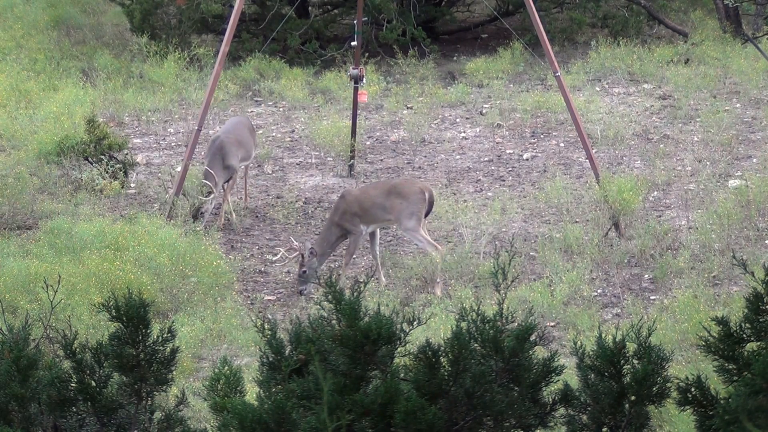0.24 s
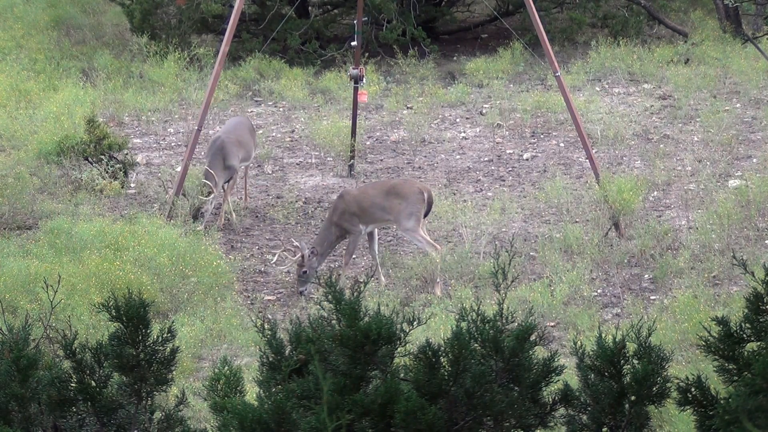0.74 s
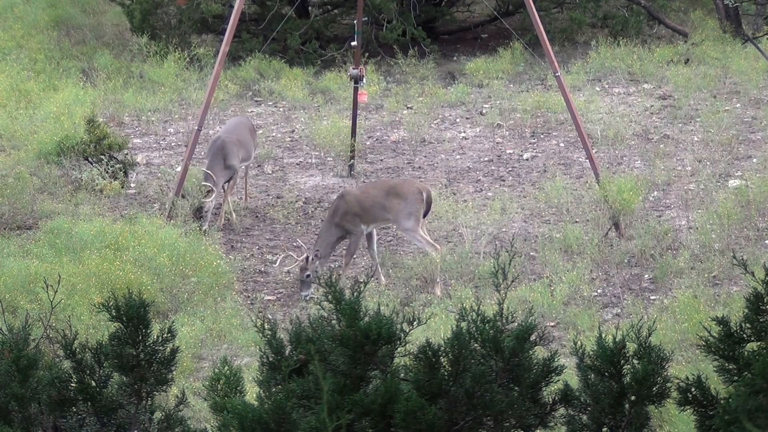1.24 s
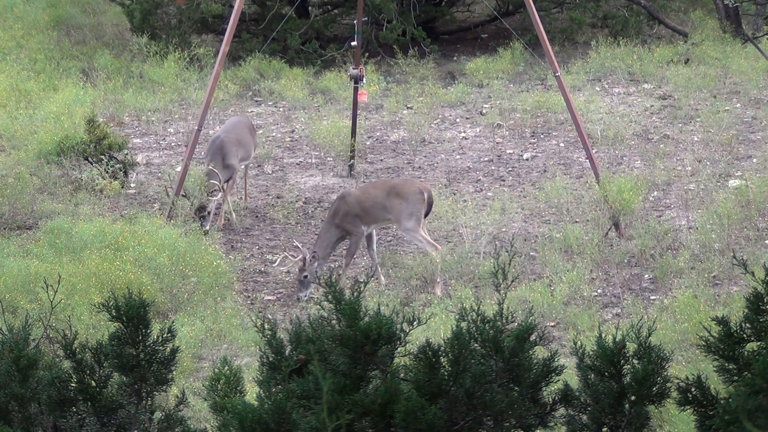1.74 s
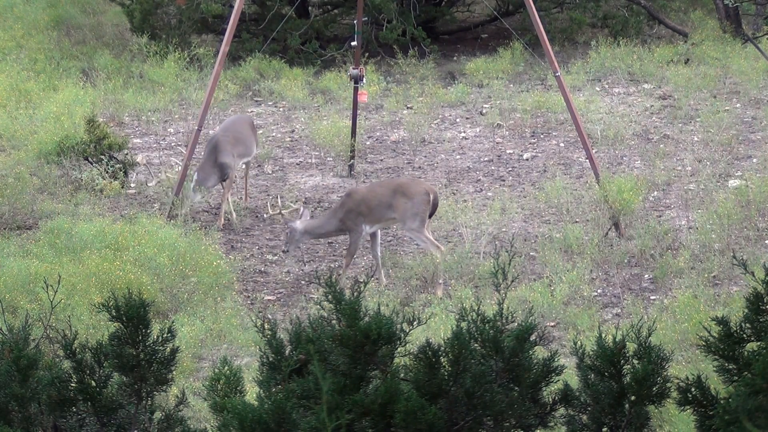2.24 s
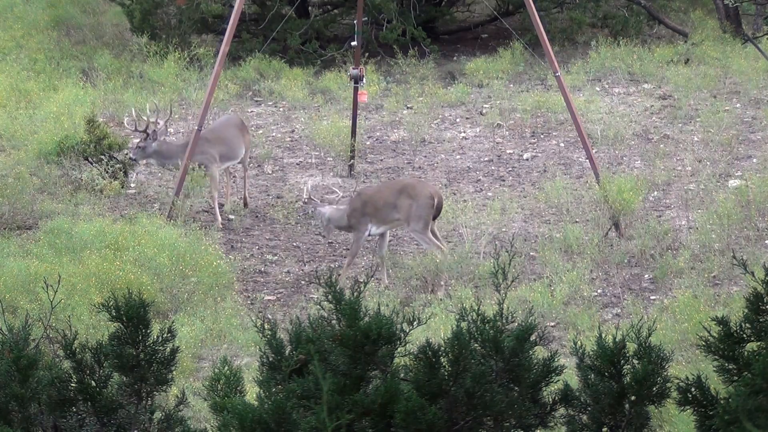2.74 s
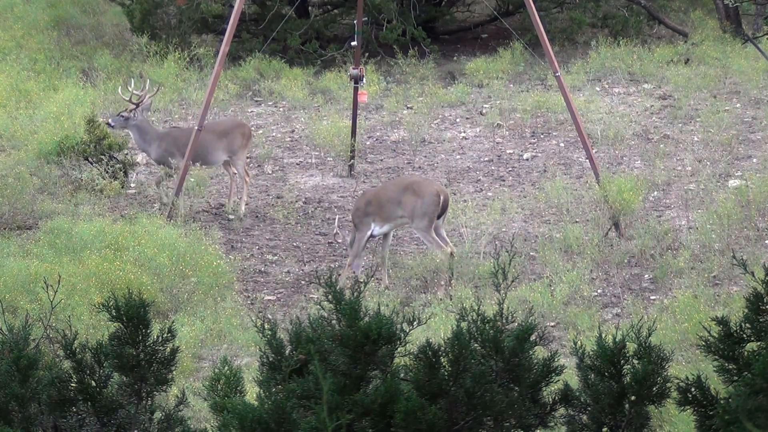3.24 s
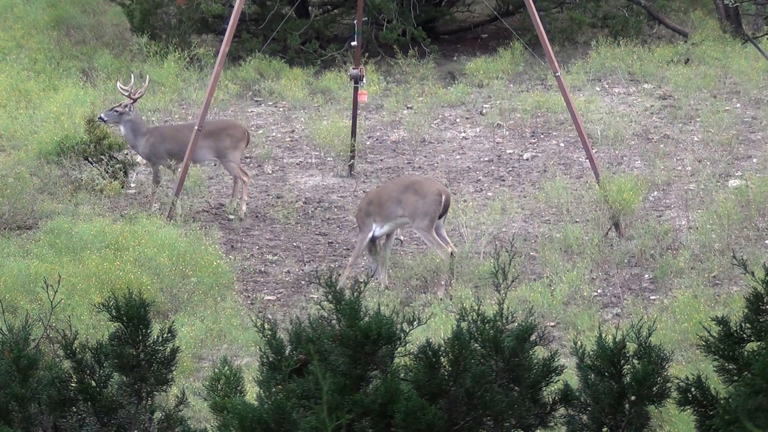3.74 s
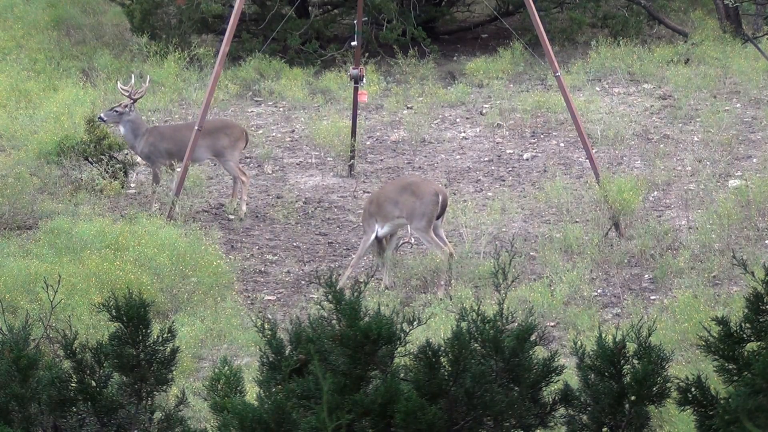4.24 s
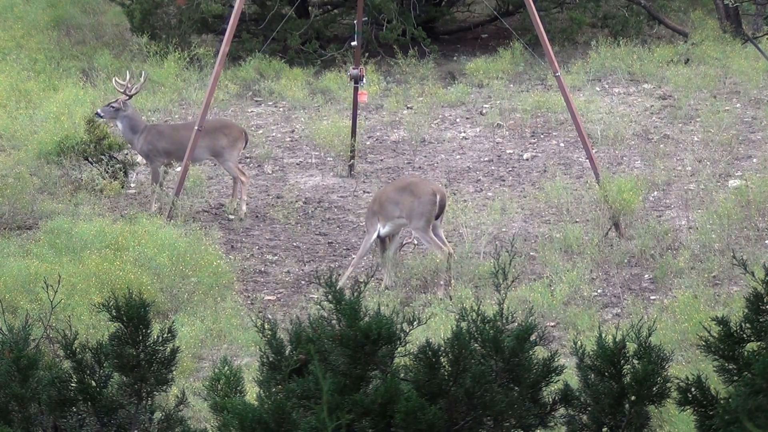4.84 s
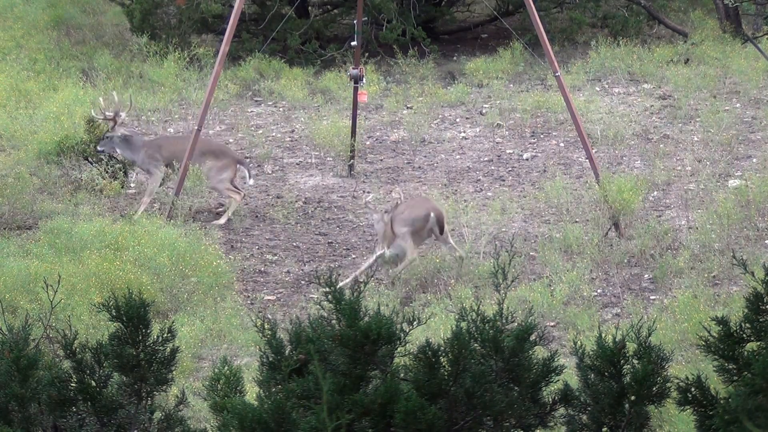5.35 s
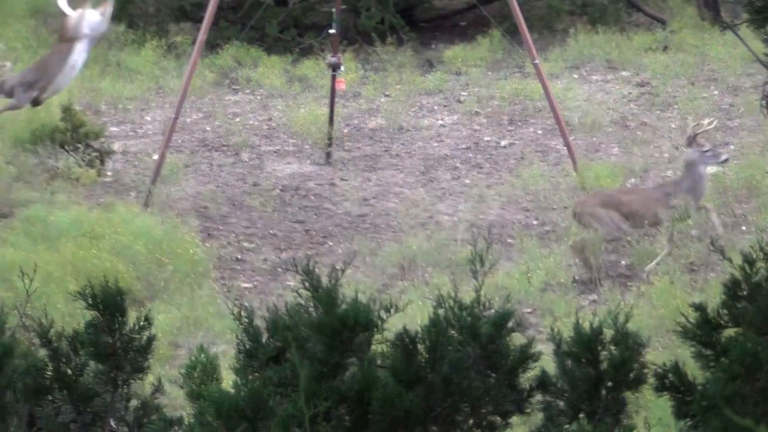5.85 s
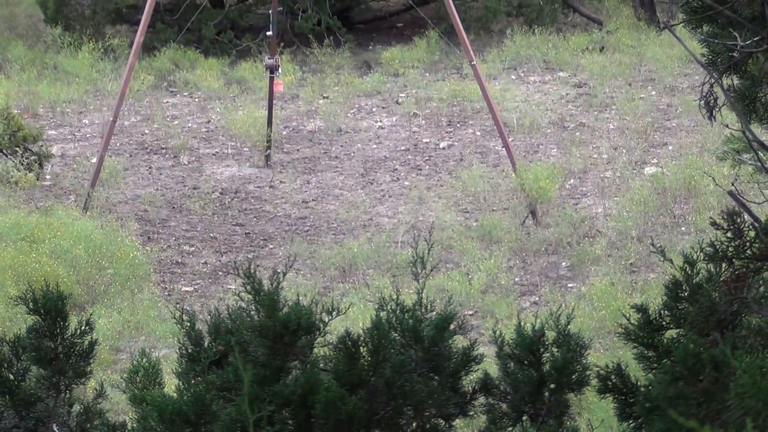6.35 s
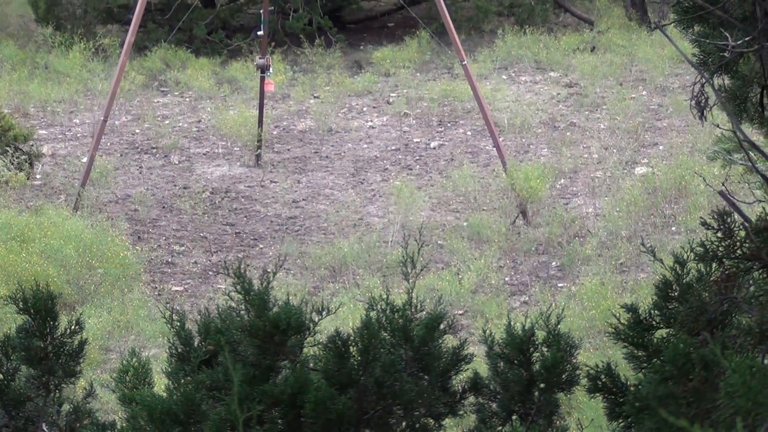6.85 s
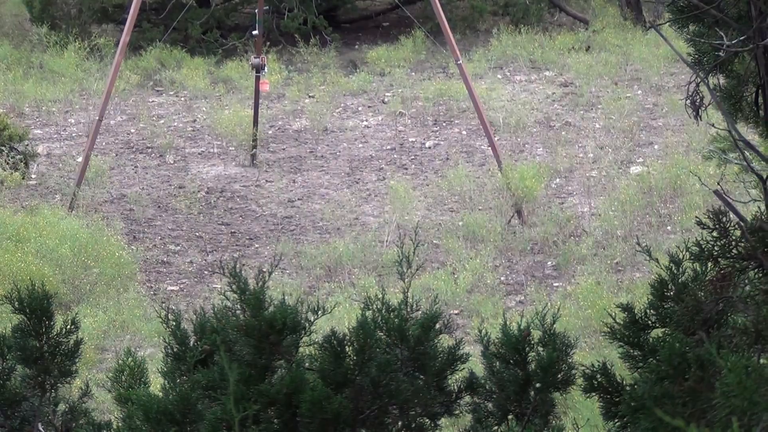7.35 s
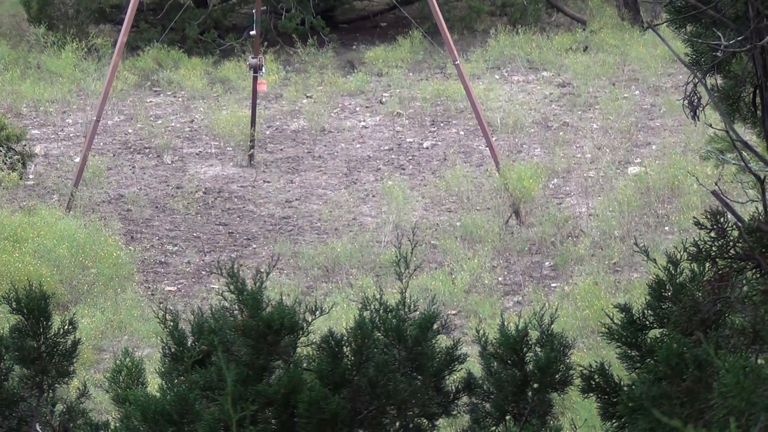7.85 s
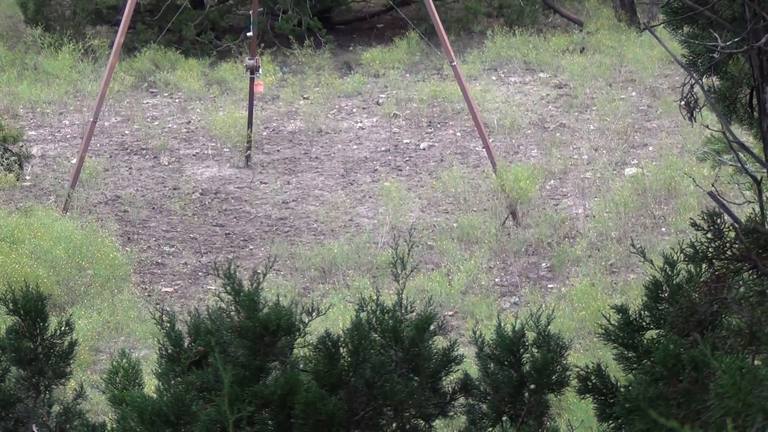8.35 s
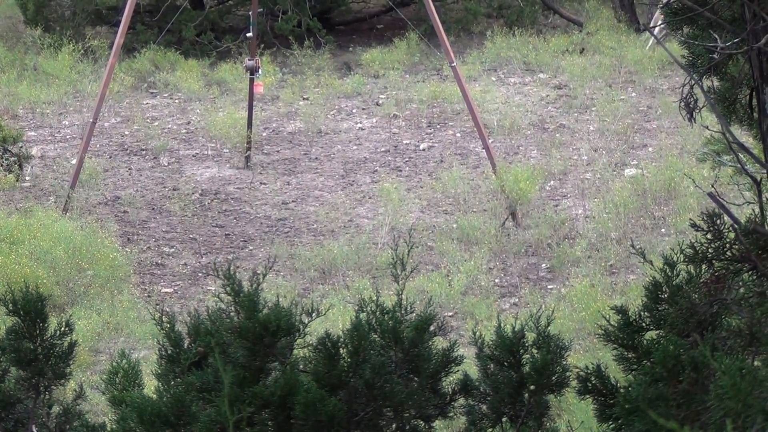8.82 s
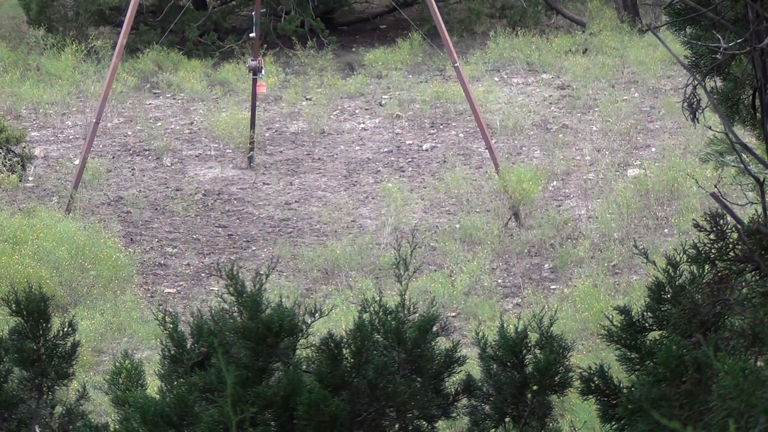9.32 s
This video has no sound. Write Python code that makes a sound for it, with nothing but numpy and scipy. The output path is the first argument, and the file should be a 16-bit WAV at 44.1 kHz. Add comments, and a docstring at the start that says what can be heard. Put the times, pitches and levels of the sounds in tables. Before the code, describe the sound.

Quiet stereo field ambience: overlapping crickets, a far chirping chorus and low hiss. A sudden loud bow slam and rattle near the microphone is followed by a sharp impact thump. A dense flurry of dry twig snaps and leaf rustle comes next, then hollow hoof-and-stone knocks towards the left, a lull, and another low tumble before faint stirring at the end.

```python
"""A clearing among scrub: crickets trill over a quiet outdoor hush until a crossbow is fired close by.
The bolt strikes; deer run over stones and through dry brush, and later knocks lean to the left.
Crickets are gliding tones with a scattered tail; the hush is shaped noise with narrow bands.
The bow is decaying noise driving resonant modes; knocks and twigs are struck resonances,
and running is uneven crackle filtered into rumble, scuffing and leaf rustle."""
import sys
import numpy as np
from scipy import signal
from scipy.fft import rfft, irfft, next_fast_len
from scipy.io import wavfile

SR = 44100
rng = np.random.default_rng(int(sys.argv[2]) if len(sys.argv) > 2 else 0)


def store_pcm(level_fs):
    """Save levels as 16-bit WAV."""
    pcm = np.round(np.clip(level_fs, -1, 1) * 32767).astype(np.int16)
    wavfile.write(sys.argv[1], SR, np.atleast_2d(pcm).T)


N = 422469   # length in samples
SIDES = np.array([[1], [-1]])   # left, right


def amp(db):
    """Level law: the amplitude ratio of a level in dB."""
    return 10 ** (np.asarray(db) / 20)


def rms_one(x):
    """Normalisation: scales the root mean square to 1."""
    return x / np.sqrt(np.mean(x ** 2) + 1e-20)


def at_hz(points, hz):
    """Interpolation of a spectrum table along a logarithmic frequency axis."""
    table = np.array(points)
    return np.interp(np.log(hz), np.log(table[:, 0]), table[:, 1])


def noise(size=N):
    """White noise: two mutually independent Gaussian signals."""
    return rng.standard_normal((2, size))


def add(out, s, x):
    """Superposition: mixes x into out from time s."""
    i = round(s * SR)
    out[..., i:i + x.shape[-1]] += x[..., :out.shape[-1] - i]


def dying(t60, rise, size):
    """Exponential decay: a quick rise, then a loss of 60 dB in each t60."""
    t = np.arange(size) / SR
    return (1 - np.exp(-t / max(rise, 1e-5))) * amp(-60 * t / max(t60, .003))


def drift(rate):
    """Slow random modulation: low-passed noise of spread 1, computed at every 40th sample."""
    r = np.exp(-80 * np.pi * rate / SR)
    white = rng.standard_normal(N // 40 + 2002)
    slow = signal.lfilter([1], [1, -2 * r, r * r], white)[2000:]   # settling is discarded
    return np.interp(np.arange(N) / 40, np.arange(len(slow)), rms_one(slow))


def resonance(x, hz, width_hz):
    """Damped mode: a two-pole filter with unit gain at its peak."""
    r = np.exp(-np.pi * max(width_hz, 1) / SR)
    poles = [1, -2 * r * np.cos(2 * np.pi * hz / SR), r * r]
    return signal.lfilter([(1 - r * r) / 2, 0, (r * r - 1) / 2], poles, x)


def band(x, hz, width_hz):
    """Cascaded resonance: the mode is applied twice for steeper skirts; rms 1."""
    return rms_one(resonance(resonance(x, hz, width_hz), hz, width_hz))


def struck(hz, width_hz, t60, size):
    """Impact excitation: a sharp contact and dying after-contacts ring a mode; near rms 1 at the start."""
    force = noise(size)[0] * dying(t60, .0001, size=size)
    force[0] += 1.1 * np.sqrt(SR / width_hz)
    x = resonance(force, hz, width_hz)
    x = resonance(x, hz, min(1.86 * width_hz, SR / 4))
    return x / np.sqrt(width_hz / SR)


# likeness of the two channels: pitch_hz, likeness (0 to 1)
CHANNEL_LIKENESS = [(25, .1), (60, 0.76), (130, 0.87), (290, 0.87), (640, 0.88), (1410, 0.92), (3100, 1),
                    (6820, 0.84), (15000, 1)]
# balance of the place, left over right: pitch_hz, level_db
LEAN = [(60, 3), (110, -1.5), (200, 5), (380, 2), (700, 1), (1290, -1), (2380, 1), (4400, 1), (8120, 0.5),
        (15000, -1)]


def coloured(pair, spectrum, low_hz=20, high_hz=20000):
    """Spectral shaping and interchannel coherence: a mid and a side signal fill the place; rms 1."""
    length = pair.shape[1]
    size = next_fast_len(length, real=True)
    hz = np.maximum(np.fft.rfftfreq(size, 1 / SR), 1)
    mid, side = rfft(pair, size)
    alike = np.clip(at_hz(CHANNEL_LIKENESS, hz), 0, 1)
    edges = 1 / np.sqrt((1 + (low_hz / hz) ** 6) * (1 + (hz / high_hz) ** 8))
    gain = amp(at_hz(spectrum, hz) + at_hz(LEAN, hz) / 2 * SIDES) * edges
    spread = np.sqrt(1 + alike) * mid + np.sqrt(1 - alike) * side * SIDES
    return rms_one(irfft(gain * spread, size)[:, :length])


# relative spectrum of the hush: pitch_hz, level_db (per Hz)
HUSH_COLOUR = [(12, -43), (20, -13.5), (86, 3), (237, -2), (289, 2.5), (428, -8), (690, -8), (913, -5),
               (1900, -13), (3060, -11), (3620, -13), (4050, -13), (4660, -13.5), (15200, -20.5),
               (16500, -20)]
# steady humming bands: pitch_hz, width_hz, level_db
HUSH_BANDS = [(189.6, 21, -70.5), (290.6, 26, -70.5), (886, 29, -74)]
HUSH_DB = -57
WHISTLE_HZ, WHISTLE_DB = 15734, -72


def hush():
    """Broadband background: wind, distance and microphone hiss, with humming bands and a thin whistle."""
    out = amp(HUSH_DB) * coloured(noise(), HUSH_COLOUR)
    for hz, width_hz, db in HUSH_BANDS:
        out += amp(db + at_hz(LEAN, hz) / 2 * SIDES) * band(noise()[0], hz, width_hz)
    return out + amp(WHISTLE_DB) * np.sin(2 * np.pi * WHISTLE_HZ * np.arange(N) / SR)


def crickets(notes, length, linger_db):
    """Stridulation and scattering: each stroke falls in pitch; the scrub returns a blurred copy."""
    out, t = np.zeros(N), np.arange(round(length * SR)) / SR
    swell = np.sin(np.pi * t / length) ** 1.1
    for s, hz, db, fall_hz, overtone_db in notes:
        cycles = hz * t + fall_hz * (t - t * t / length) / 2
        phase = 2 * np.pi * cycles + rng.uniform(0, 6.1)
        tone = np.sin(phase) + amp(overtone_db) * np.sin(2 * phase)
        # the file catches unevenly
        catches_db = 2.5 * np.interp(t, np.linspace(0, length, 9), rng.standard_normal(9))
        tone *= amp(catches_db)
        add(out, max(s - length / 2, 0), amp(db + rng.normal(0, 0.54)) * swell * tone)
    shared, apart = noise(9000) * dying(0.21, 0.009, size=9000)
    scatter = shared + .3 * SIDES * apart
    scatter /= np.linalg.norm(scatter[0])
    blurred = signal.fftconvolve(out[None], scatter)[:, :N]
    return amp(.9 * SIDES) * (out + amp(linger_db) * blurred)


# level of the far chorus: time_s, level_db
CHORUS_LEVEL = [(0, -67), (5.05, -67), (5.3, -73), (9.58, -73)]


def chorus():
    """Incoherent summation: many far crickets sound short falling notes at random in two bands."""
    notes = []
    for when, pick, loud in rng.random((300, 3)):
        centre_hz = 4000 if pick < .5 else 4280
        notes.append((when * N / SR, centre_hz + 120 * (pick % .5 - .25), 9 * loud, 400, -40))
    s, db = np.transpose(CHORUS_LEVEL)
    level = amp(np.interp(np.arange(N) / SR, s, db))
    return level * rms_one(crickets(notes, .04, -2.0))


# single higher chirps: centre_s, pitch_hz, level_db
CHEEPS = [(0.077, 4200, -56), (0.206, 4160, -55), (0.357, 4020, -57), (1.041, 3950, -56),
          (1.113, 4260, -56.5), (1.17, 4000, -56.5), (1.245, 4300, -57), (1.862, 3940, -58),
          (1.971, 3970, -57), (2.142, 4140, -59), (2.272, 4300, -57), (2.657, 3980, -58),
          (2.782, 3970, -59), (3.002, 4140, -60), (3.048, 4200, -59), (3.183, 4200, -58),
          (3.471, 4000, -56.5), (3.59, 4000, -56), (4.171, 4300, -56), (4.309, 4300, -58),
          (4.757, 4000, -59), (4.874, 4000, -57)]


def cheeps():
    """Frequency glide: isolated chirps, each falling through 450 Hz."""
    return crickets([(s, hz, db, 450, -40) for s, hz, db in CHEEPS], .045, -3)


# phrases of five wing strokes: cricket, first_stroke_s, pitch_hz, level_db, overtone_db (re fundamental)
TRILL_PHRASES = [("far", .012, 3120, -58, -30), ("low", .282, 2935, -51, -35),
                 ("high", .321, 3290, -55.5, -30), ("loud", .544, 3042, -47.5, -28),
                 ("far", 0.93, 3150, -55.5, -30), ("low", 0.98, 2925, -50.5, -35),
                 ("far", 1.425, 2990, -55.5, -35), ("loud", 1.47, 3070, -48.5, -28),
                 ("high", 1.575, 3330, -53.5, -30), ("far", 1.88, 3070, -63.5, -30),
                 ("low", 2.115, 2950, -51, -35), ("high", 2.371, 3275, -53, -30),
                 ("loud", 2.386, 3033, -48, -29), ("far", 2.824, 3075, -62, -3),
                 ("low", 2.855, 2970, -49.5, -35), ("high", 3.417, 3270, -57, -30),
                 ("low", 3.572, 2990, -50.5, -35), ("loud", 3.843, 3037, -46.5, -17.5),
                 ("high", 4.218, 3285, -55.5, -30), ("low", 4.303, 2950, -51, -35),
                 ("loud", 4.697, 3047, -47, -19), ("low", 4.853, 2980, -51, -41)]
# voice of each cricket: phrase_s, stroke_fall_hz, first_stroke_lower_hz
CRICKET_VOICES = {"low": (.215, 304, 90), "loud": (.21, 210, 17), "high": (.19, 110, 40),
                  "far": (.22, 180, 10)}
# place of each stroke in its phrase: share (0 to 1)
STROKE_SHARES = [0, .21, .45, .72, 1]


def trills():
    """Pulse-train song: each phrase is a row of strokes, of which the first is weaker and lower."""
    notes = []
    for who, first, hz, db, overtone_db in TRILL_PHRASES:
        phrase_s, fall_hz, lower_hz = CRICKET_VOICES[who]
        for share in STROKE_SHARES:
            opening = share == 0
            notes.append((first + share * phrase_s, hz - lower_hz * opening, db - 3.4 * opening,
                          fall_hz, overtone_db))
    return crickets(notes, .035, -4.5)


SWELL_DB_PER_S = 300


def bout(s, held, dying_db_per_s):
    """Exponential envelope: the gain swells up to time s, holds and dies away."""
    t = np.arange(N) / SR - s
    return amp(SWELL_DB_PER_S * np.minimum(t, 0) - dying_db_per_s * np.maximum(t - held, 0))


# bouts of running and shifting: full_strength_s, held_s, dying_db_per_s, rumble_db, rumble_hz,
# scuff_db, leaf_db, rumble_pan_db (left over right)
RUNNING_BOUTS = [(5.295, 0.0042, 400, -31.5, 420, -44, -46, 3),
                 (5.345, 0.023, 106, -33, 800, -40.5, -38.5, 0), (5.85, .01, 300, -51, 450, -59, -64, 2),
                 (5.898, 0.06, 250, -45.5, 450, -39.5, -39, -1), (6.14, 0.013, 88, -56.5, 654, -74, -62, 1),
                 (6.29, 0.058, 120, -56, 460, -64, -60, 4), (6.474, 0.005, 400, -49, 573, -52, -52, 1),
                 (6.55, 0.018, 60, -59, 477, -55.5, -49.5, 4), (6.8, 0.046, 252, -40.5, 554, -55, -63, 9.5),
                 (7.05, 0.024, 66, -65, 420, -70, -68, 3), (7.9, .1, 80, -60.5, 334, -72, -70, 2),
                 (8.225, .01, 305, -50, 283, -67, -68, 5), (8.36, 0.055, 150, -54, 450, -55, -57.5, 6),
                 (8.492, 0.084, 402, -32, 432, -55, -59, 7.5),
                 (8.624, 0.0064, 600, -41.5, 340, -66, -61, 7), (8.75, 0.021, 67, -58, 480, -60, -63, 8),
                 (8.915, 0.053, 220, -45.5, 374, -62, -63, 8), (9.16, 0.071, 80, -64, 520, -59, -67, 3),
                 (9.28, 0.071, 150, -62, 670, -56.5, -56.5, 4), (9.57, .01, 200, -39, 472, -55, -47, 5)]
# faint stirring of the brush between bouts: time_s, scuff_db, leaf_db
FAINT_STIR = [(5.3, -53, -53), (5.8, -58.5, -55), (6.4, -62.5, -55.5), (6.9, -62, -58), (7.3, -65.5, -68),
              (7.8, -69, -72), (8.2, -60, -62), (9, -55.5, -61), (9.58, -58, -60)]
STIR_RUMBLE_DB, STIR_RUMBLE_HZ = -67, 450


def efforts():
    """Power addition: bouts add to the stirring; the strongest dominates rumble pitch and side."""
    s, *stir_db = np.transpose(FAINT_STIR)
    scuff, leaf = [amp(np.interp(np.arange(N) / SR, s, db)) ** 2 for db in stir_db]
    rumble = np.full(N, amp(STIR_RUMBLE_DB) ** 2)
    pitch, side = rumble * STIR_RUMBLE_HZ, np.zeros(N)
    for s, held, dying_db_per_s, rumble_db, hz, scuff_db, leaf_db, pan_db in RUNNING_BOUTS:
        power = bout(s, held, dying_db_per_s) ** 2
        low = amp(rumble_db) ** 2 * power
        rumble = rumble + low
        pitch = pitch + hz * low
        side = side + pan_db * low
        scuff = scuff + amp(scuff_db) ** 2 * power
        leaf = leaf + amp(leaf_db) ** 2 * power
    return np.sqrt(rumble), pitch / rumble, side / rumble, np.sqrt(scuff), np.sqrt(leaf)


def crackle(per_s, spread_db, hiss):
    """Shot noise: random small contacts of uneven size over a smooth hiss."""
    contact = rng.random(N) < per_s / SR
    sizes = amp(spread_db * np.minimum(rng.exponential(1, N), 5)) * contact
    grains = signal.lfilter([1], [1, -.97], rms_one(sizes))   # each lasts about a millisecond
    return noise() * (hiss + rms_one(grains))


# heavy blows that shake ground and stand: full_strength_s, level_db
GROUND_TREMORS = [(5.33, -44.5), (5.7, -56), (5.821, -46.5), (6.2, -58), (6.74, -45), (8.5, -57.5)]
TREMOR_DYING_DB_PER_S, TREMOR_REST_DB = 70, -64.5


def tremors():
    """Low-frequency ground vibration: heavy blows swell and die in an unsteady band near 86 Hz."""
    shared, apart = noise()
    shaking = amp(TREMOR_REST_DB)
    for s, db in GROUND_TREMORS:
        shaking = shaking + amp(db) * bout(s, 0, TREMOR_DYING_DB_PER_S)
    boom = shaking * amp(4.9 * drift(12.7)) * band(shared + .5 * SIDES * apart, 86, 195)
    return boom * (np.arange(N) / SR > BOW_BURSTS[1][0])   # silent before the string slam


# relative spectrum of scuffs, leaves and cracks: pitch_hz, level_db (per Hz)
BRUSH_COLOUR = [(590, 9), (1000, 1), (1320, -0.5), (2390, -5), (3010, -3.5), (3500, -6), (4620, -2.5),
                (6700, -1), (7700, 6.5), (16000, -40.5)]


def moving():
    """Friction and cavity resonance: hooves and bodies in dirt, stones and leaves; the rumble shifts."""
    t = np.arange(N) / SR
    rumble_gain, rumble_hz, pan_db, scuff_gain, leaf_gain = efforts()
    near, apart = crackle(150, 3.0, 1.5)
    source = near + 0.076 * SIDES * apart
    hollows = np.geomspace(220, 1200, 8)   # Hz
    shares = [np.exp(-(np.log(hz / rumble_hz) / 0.33) ** 2) + 0.2 for hz in hollows]
    rumble = sum(share * band(source, hz, 0.34 * hz) for share, hz in zip(shares, hollows))
    rumble /= np.sqrt(sum(share * share for share in shares))
    scuff = coloured(crackle(390, 0.8, 1.8), BRUSH_COLOUR, low_hz=1110, high_hz=4500)
    leaves = coloured(crackle(500, 5.7, 2.2), BRUSH_COLOUR, low_hz=4500)
    leaves = leaves * amp(1.6 * drift(20))
    out = rumble_gain * amp(pan_db / 2 * SIDES) * rumble + scuff_gain * scuff + leaf_gain * leaves
    return out * np.clip((t - BLOWS[2][0]) / 0.0053, 0, 1)   # silent before the bolt lands


# dry twigs: start_s, ring_db, pitch_hz, t60_s, click_db
DRY_TWIGS = [(2.4487, -48.5, 6200, 0.041, -65), (5.5569, -30.5, 7400, 0.016, -42),
             (5.573, -41, 7760, .015, -58), (5.6282, -37, 4900, 0.024, -50), (5.832, -35, 4000, 0.022, -38),
             (5.8679, -34, 6800, .013, -48), (5.8846, -30.5, 5900, .015, -50),
             (5.8908, -30.5, 4200, .024, -42), (5.913, -30, 5630, .02, -50), (5.923, -31, 5900, .013, -46),
             (5.9294, -23.5, 7300, .0059, -32), (5.9443, -35.5, 3860, .037, -48),
             (5.9555, -29, 6230, .0075, -42), (5.967, -39, 4900, .024, -50),
             (5.9922, -35, 8000, 0.011, -26), (6.0046, -37, 6600, .013, -42), (6.0599, -25, 9400, .01, -16),
             (6.091, -39, 7100, 0.014, -54), (6.3246, -23, 4500, 0.014, -33),
             (6.3366, -39, 7000, .015, -50), (6.537, -45, 7600, .015, -54),
             (6.5526, -38.5, 7200, 0.013, -44), (6.642, -39, 6700, .015, -52),
             (7.0326, -53, 7040, .015, -66), (7.237, -51, 6770, .015, -62), (8.28, -42.5, 5800, .0084, -56),
             (8.4125, -47, 6660, .015, -54), (8.5288, -42, 10000, .03, -39),
             (9.1188, -43, 5400, 0.051, -53), (9.235, -46, 5460, 0.025, -58),
             (9.2538, -54, 6450, .019, -64), (9.3168, -57, 7000, .015, -64), (9.353, -43, 5940, .005, -50),
             (9.5342, -45, 6300, .02, -56)]


def twigs():
    """Brittle fracture: each snap is a short bright ring under a broad click that dies sooner."""
    out, size = np.zeros((2, N)), 4096
    for s, db, hz, t60, click_db in DRY_TWIGS:
        click = signal.lfilter([1, -1], [1, -.8], noise(size)[0]) * dying(0.8 * t60, .0001, size=size)
        ring = struck(hz, 0.55 * hz, t60, size=size)
        add(out, s, amp(at_hz(LEAN, hz) / 2 * SIDES) * (amp(db) * ring + amp(click_db) * click))
    return out


# hollow modes that every knock wakes: pitch_hz, level_db (relative), width_hz
BODY_MODES = [(891, -2.5, 143), (1360, -4.5, 107), (1630, -6, 75), (2100, -8, 117), (2725, -5, 132),
              (3595, -4, 196), (4300, -4.5, 210)]
BODY_REACH_OCTAVES = .6


def body(knock_hz, t60, size):
    """Modal coupling: modes near the knock's pitch ring most, each with a new strength."""
    out = np.zeros(size)
    for hz, db, width_hz in BODY_MODES:
        distance = np.log2(hz / knock_hz) / BODY_REACH_OCTAVES
        gain = amp(db - 5.4 * distance ** 2 + rng.normal(0, 2.6))
        out += gain * struck(hz, width_hz, t60, size=size)
    return out


# hooves, stones and wood: start_s, thud_db, knock_db, crack_db, thud_hz, knock_hz,
# knock_t60_s, pan_db (left over right, thud and knock)
BLOWS = [(3.8264, -53, -53.5, -68, 640, 2290, 0.035, 1.5), (4.991, -61, -56, -61, 1050, 2950, 0.061, 2),
         (5.2872, -32, -43, -54, 300, 1210, 0.031, 1.5), (5.3277, -26, -25.5, -17.5, 970, 1650, 0.044, 1),
         (5.3342, -19, -55, -10, 910, 1270, 0.026, 1.5), (5.8159, -25.5, -50, -19.5, 564, 1600, 0.016, 2),
         (5.818, -35, -24, -28, 247, 2600, 0.078, 2.5), (5.8589, -53, -48, -47, 253, 1240, 0.12, 3),
         (6.304, -43.5, -39, -52, 1250, 3550, 0.033, 2), (6.466, -52, -45, -54, 258, 1350, 0.056, -0.5),
         (6.6758, -29.5, -28, -38, 1090, 1980, 0.045, 3), (6.6866, -42, -32, -32, 440, 1220, 0.025, 3.5),
         (6.7314, -34, -29.5, -29, 610, 1390, 0.02, 4.5), (6.7608, -24.5, -21.5, -26, 760, 1940, 0.036, 7),
         (6.769, -28, -28, -26, 830, 2570, 0.016, 5), (6.7873, -42.5, -43.5, -61, 680, 1410, 0.032, 6),
         (6.847, -48, -46.5, -60, 420, 2550, 0.065, 6), (6.8746, -60, -49, -53, 437, 1420, 0.071, -2),
         (7.867, -64, -65, -47, 288, 4430, 0.021, 4), (8.079, -65, -55.5, -56, 850, 1570, 0.039, 1),
         (8.1225, -58, -47.5, -54, 1090, 2100, 0.065, 2), (8.4959, -41.5, -60, -62, 444, 1330, 0.15, -2),
         (8.5296, -44, -37, -50, 497, 3180, 0.05, 4), (8.6131, -38.5, -64, -61, 280, 1210, 0.03, 8),
         (8.6989, -43, -49, -39.5, 620, 1440, 0.027, 6), (8.7174, -30, -48, -57, 770, 1560, 0.015, 4.5),
         (8.7342, -43, -45.5, -41.5, 272, 1760, 0.06, 6.5), (9.046, -65, -48, -50, 1040, 1600, 0.098, 3),
         (9.1353, -62, -47, -43, 610, 1420, 0.062, 3), (9.182, -61, -54, -59, 1000, 2710, 0.036, 4),
         (9.5618, -35, -71, -40, 600, 1190, 0.02, 1), (9.5706, -62, -57, -36.5, 610, 3270, 0.031, 2)]
BODY_DB = -4   # re knock


def hits():
    """Impact with frequency-dependent damping: dull thud, woody or stony knock and shorter bright crack."""
    out, size = np.zeros((2, N)), 4096
    for s, thud_db, knock_db, crack_db, thud_hz, knock_hz, t60, pan_db in BLOWS:
        thud = struck(thud_hz, 0.62 * thud_hz, 1.56 * t60, size=size)
        knock = struck(knock_hz, 1.25 * knock_hz, t60, size=size)
        knock = knock + amp(BODY_DB) * body(knock_hz, t60, size=size)
        crack = coloured(noise(size), BRUSH_COLOUR, low_hz=4000)
        crack = crack * dying(0.94 * t60, 0.000084, size=size)
        low = (amp(thud_db) * thud + amp(knock_db) * knock) * amp(pan_db / 2 * SIDES)
        add(out, s, low + amp(crack_db) * crack)
    return out


# release, string slam and rattles of the bow: start_s, level_db, t60_s
BOW_BURSTS = [(5.062, -14.5, 0.042), (5.0718, -14, 0.17), (5.097, -23, 0.1), (5.12, -22, 0.051),
              (5.149, -46, 0.055)]
# modes of limbs and stock: pitch_hz, level_db (relative), t60_s
BOW_MODES = [(69.6, 11.5, 0.51), (244, 9, 0.14), (420, 6, 0.03), (690, 13, 0.091), (986, 11.5, 0.045),
             (1650, 10, 0.047), (2530, 6, 0.046), (6200, 9, .06), (6500, 2, 0.076), (8300, 0, 0.055)]
# relative spectrum of the rattle: pitch_hz, level_db (per Hz)
RATTLE_COLOUR = [(24, -47), (40, -19), (121, -30), (262, -4.5), (600, -24), (697, -5), (1370, -14),
                 (1630, -7.5), (2050, -14), (2570, -9.5), (4800, -15), (7540, -9), (16000, -40.5)]
# relative spectrum of the returning wash: pitch_hz, level_db (per Hz)
WASH_COLOUR = [(40, -16), (150, -5), (280, -33), (800, -12), (2000, -17), (4000, -15), (8100, -6.5),
               (10500, -20), (16000, -34)]
WASH_DB, WASH_T60_S = -29.5, 0.74
SLAM_KICK_DB = 12   # one hard blow starts the limbs ringing
TWANG_HZ, TWANG_DB, TWANG_T60_S = 1556, -33, .55   # one metal part rings on, clean


def crossbow():
    """Forced vibration and reverberation: bursts ring limbs and stock; the scrub returns a dying wash."""
    size, start, slam_s = 40000, BOW_BURSTS[0][0], BOW_BURSTS[1][0]
    t = np.arange(size) / SR
    force = np.zeros(size)
    for s, db, t60 in BOW_BURSTS:
        add(force, s - start, amp(db) * dying(t60, 0.00042, size=size))
    rattle = force * coloured(noise(size), RATTLE_COLOUR)
    # the limbs start ringing at the string slam; the bright release click before it does not ring them
    slam = t > slam_s - start
    kick = slam * force * noise(size)[0]
    kick[np.argmax(slam)] += amp(SLAM_KICK_DB)
    rings = np.zeros(size)
    for hz, db, t60 in BOW_MODES:
        rings += amp(db) * resonance(kick, hz, np.log(1000) / np.pi / t60)   # width from decay
    wash = amp(WASH_DB) * dying(WASH_T60_S, 0.016, size=size) * coloured(noise(size), WASH_COLOUR)
    twang = amp(TWANG_DB) * dying(TWANG_T60_S, .004, size=size) * np.sin(2 * np.pi * TWANG_HZ * t)
    out = np.zeros((2, N))
    add(out, start, rattle + rings * amp(2.7 * SIDES) + wash)
    add(out, slam_s, twang * amp(2.9 * SIDES))
    return out


def scene():
    """Linear superposition of all sources at the microphone."""
    insects = chorus() + cheeps() + trills()
    return hush() + insects + tremors() + moving() + twigs() + hits() + crossbow()


CUTOFF_HZ = 16800


def record(dry):
    """Saturation and band limiting: peaks are rounded, then the top of the spectrum is cut."""
    rounded = .7 * np.tanh(dry / .7)
    return signal.sosfilt(signal.cheby2(12, 70, CUTOFF_HZ, fs=SR, output="sos"), rounded)


dry = scene()
out = record(dry)
store_pcm(out)
```